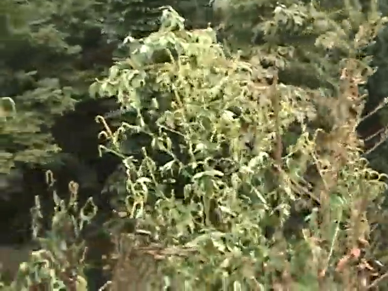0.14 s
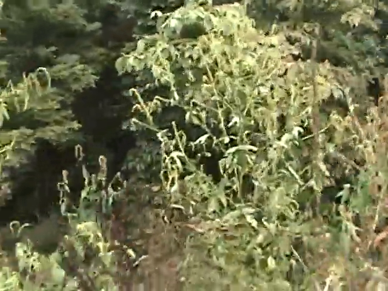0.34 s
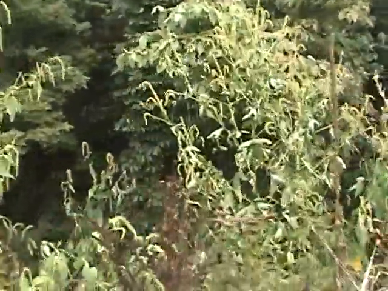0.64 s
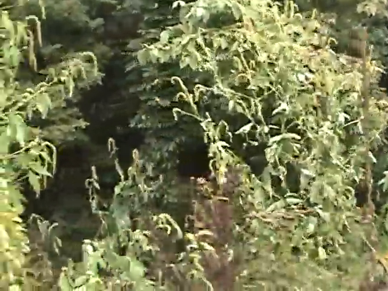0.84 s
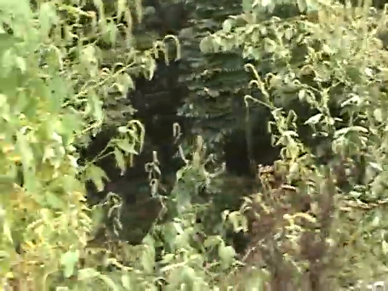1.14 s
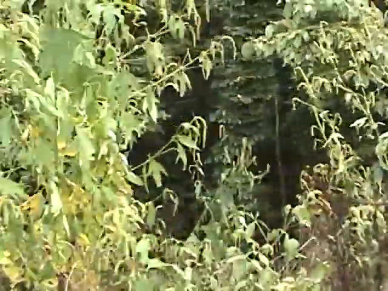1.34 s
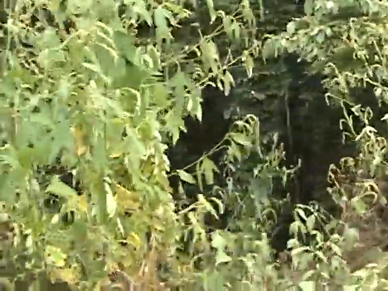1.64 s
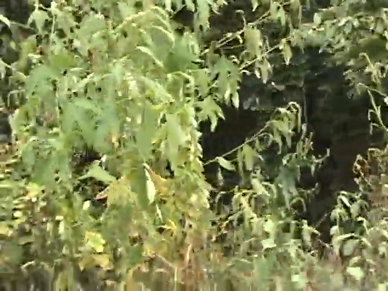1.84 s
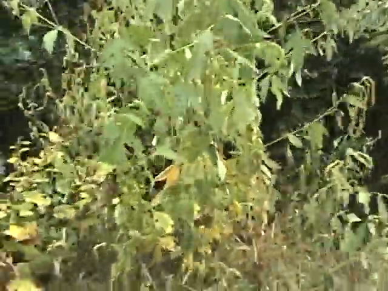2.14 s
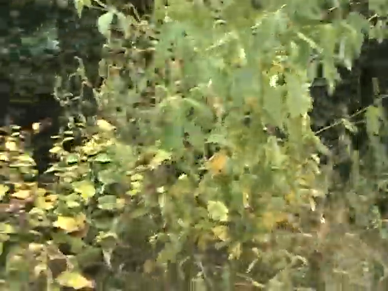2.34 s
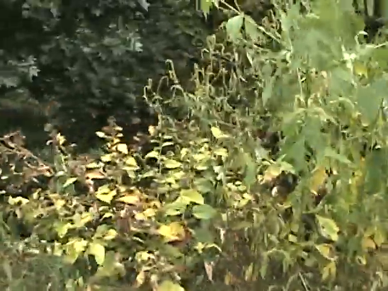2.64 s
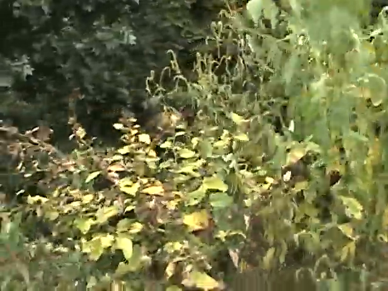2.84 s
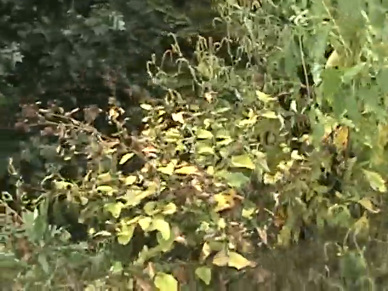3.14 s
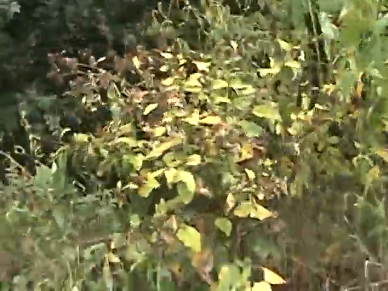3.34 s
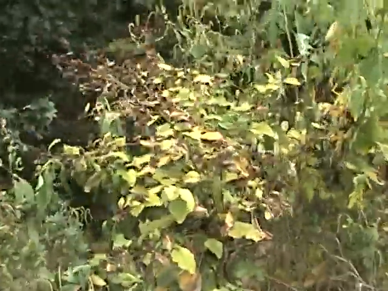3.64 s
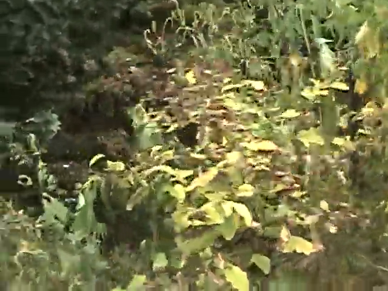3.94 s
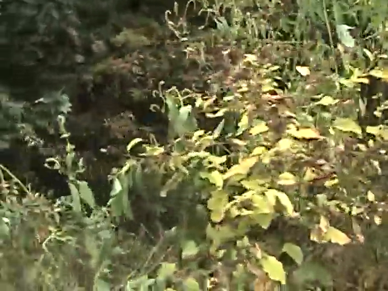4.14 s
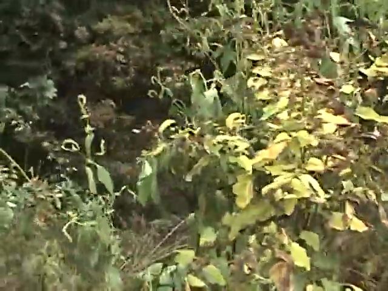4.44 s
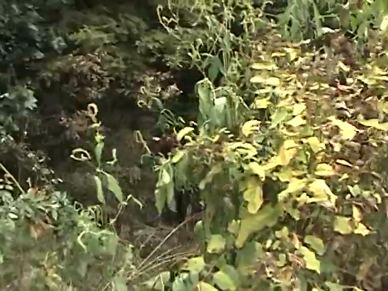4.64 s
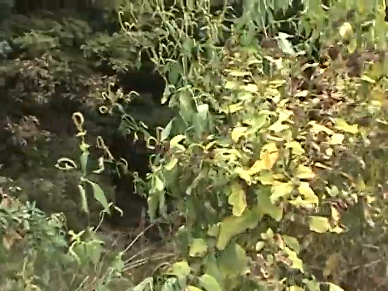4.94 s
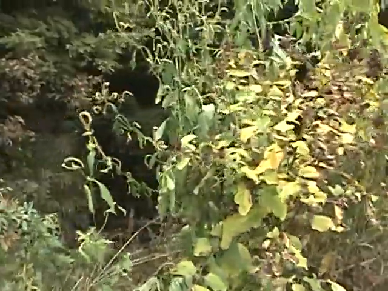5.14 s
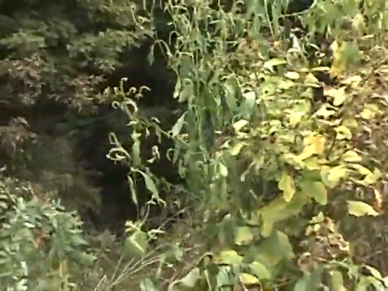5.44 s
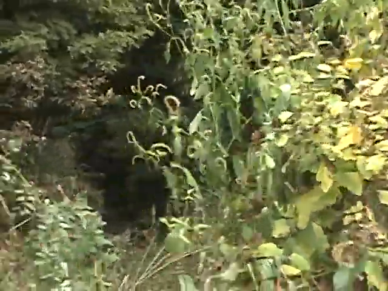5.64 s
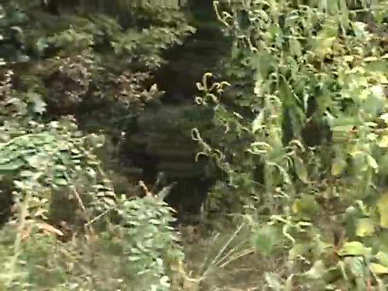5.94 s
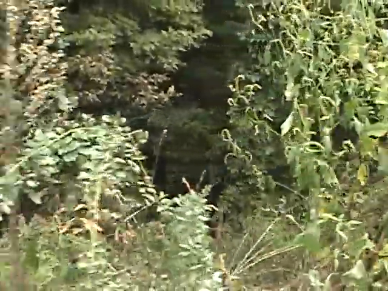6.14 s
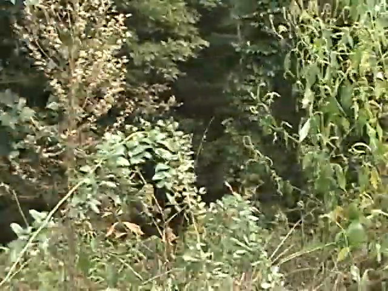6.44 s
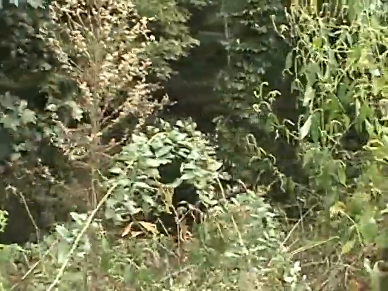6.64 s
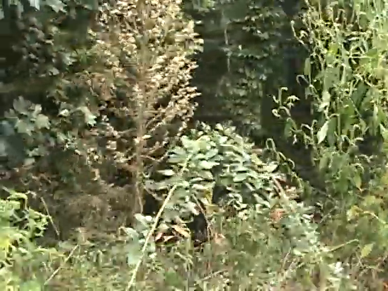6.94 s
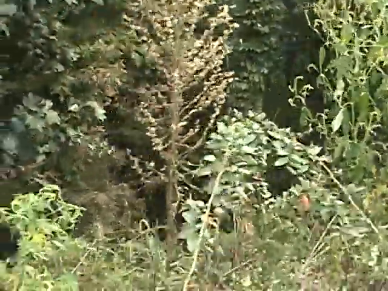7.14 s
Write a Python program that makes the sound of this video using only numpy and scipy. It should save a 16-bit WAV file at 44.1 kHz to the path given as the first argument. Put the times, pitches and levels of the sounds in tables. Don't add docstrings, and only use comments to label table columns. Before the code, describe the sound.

Overlapping hound bays, yips and cracking barks ring through the trees while crickets chirp, leaves rustle and drops tick close by.

```python
import sys
import numpy as np
from scipy import signal
from scipy.fft import rfft, irfft, next_fast_len
from scipy.io import wavfile
from scipy.ndimage import uniform_filter1d

SR = 44100
rng = np.random.default_rng(int(sys.argv[2]) if len(sys.argv) > 2 else 0)


def rack_gain(trim_db):
    fader = np.asarray(trim_db, float)
    return 10 ** (fader / 20)


def generate_wav(signal):
    frames = np.transpose(np.atleast_2d(signal))
    scaled = np.clip(frames, -1, 1) * 32767
    pcm = np.round(scaled).astype(np.int16)
    wavfile.write(sys.argv[1], SR, pcm)


N = 321489
T = np.arange(N) / SR

# frequency in Hz, level in dB per Hz.
WOODS = [(24, -23.5), (40, -1.5), (737, -3), (1950, -12), (3280, -15.5), (3960, -17.5), (4790, -5.5),
         (5790, -19.5), (6830, -14.5), (10700, -33), (11500, -46), (15000, -67), (22000, -120)]
WOODS_DB = -49
# time in seconds, peak in dB, seconds to drop 20 dB.
GUSTS = [
    (0, -61, 0.5),
    (.85, -57, 0.2),
    (1.08, -47.5, 0.03),
    (1.25, -42.5, 0.26),
    (1.55, -50.5, 0.1),
    (2.3, -57.5, 0.01),
    (2.65, -60.5, 0.12),
    (3.02, -49, 0.25),
    (4.62, -53, 0.1951),
]
# time in seconds, peak in dB, seconds to drop 20 dB.
RUSTLES = [
    (.385, -66.5, 0.45),
    (1.09, -64, 0.32),
    (1.76, -64, 0.2254),
    (2.3, -67.5, 0.39),
    (2.66, -59.5, 0.25),
    (3.59, -63, 0.46),
    (4.71, -76, 0.87),
    (5.07, -64, 0.28),
    (5.29, -71, 0.7),
]
CALM_BREEZE_DB, CALM_LEAVES_DB = -78.5, -77.5
# centre in Hz, width in Hz, level in dB, pulses per second, pulse depth from 0 to 1, swell in dB.
CHORUS = [
    (3289, 66, -64.5, 29, 0.3, 4),
    (4900, 370, -63, 4.4, 0.9, 4),
    (6824, 480, -66.5, 49.5, 0.9, -1),
    (7712, 740, -65, 26, 0.2, 2),
    (177, 26, -62.5, 9, 0.03, 0.5),
]
# start in seconds, peak in dB, pitch in Hz.
CHIRPS = [(0.2346, -41.5, 4500), (1.062, -44, 5090), (1.3314, -39, 5005), (1.8395, -38.5, 5030),
          (2.4542, -38.5, 5080), (2.9876, -40.5, 5020), (4.6214, -44, 4880), (5.2732, -44.5, 4900),
          (5.9424, -43, 4860), (6.348, -43.5, 4844), (6.8843, -43.5, 4890), (3.96, -47.5, 5000),
          (4.363, -49, 5100), (5.61, -45, 4900)]
# start in seconds, peak in dB, pitch in Hz.
LONE_PULSES = [(0.0, -41, 4540), (0.0094, -42.5, 5020), (0.04, -40, 4560), (0.0546, -38, 5076),
               (0.5478, -46, 4960), (0.5759, -43, 4925), (7.198, -46.5, 4846), (2.955, -46.5, 5000),
               (4.962, -47, 4900), (5.003, -45, 4900), (5.193, -47, 4940), (5.813, -47, 4950)]
PULSE_GAP_S, PULSE_S, PULSE_GROW_DB = 0.041, 0.019, 1

# time in seconds, pitch in Hz, effort in dB, mouth opening (0 shut, 1 open).
THIN_HOUND = [
    [(.05, 739.2, -52.5, 0.47), (.085, 736, -47, 0.24), (.19, 727, -66, 0.03)],
    [(.78, 1640, -51, 0.8), (.9, 1693, -35, .88), (.96, 1713, -43, 0.8)],
    [(4.8, 770, -34.5, 0.4), (4.86, 790.8, -26, 0.33), (4.93, 776, -38.5, .35)],
    [(5.06, 768.9, -26.5, 0.29), (5.14, 790, -24.5, 0.52), (5.27, 800.6, -29, 0.53),
     (5.38, 789.2, -32.5, 0.41)],
    [(5.41, 1508, -38, 1.21), (5.44, 1504, -32.5, 1.27), (5.54, 1496, -49, 1.14)],
]
DEEP_HOUND = [
    [(0.255, 471.5, -38.5, 0.75), (0.285, 515.7, -26.5, 0.84), (0.34, 534.4, -22.5, 0.5),
     (0.46, 543.4, -22, 0.47), (0.62, 543.3, -30, 0.56), (0.68, 545, -36.5, 0.63),
     (0.745, 542.6, -20.5, 0.4), (0.89, 561.8, -19.5, 0.46), (0.965, 578.1, -26.5, 0.4)],
    [(2.07, 507.9, -37, 0.88), (2.11, 526.7, -20.5, 0.61), (2.15, 545.1, -22, 0.75), (2.2, 530.5, -34, 0.5),
     (2.3, 528.7, -32.5, 0.31), (2.62, 520.2, -35, 0.43), (2.85, 524.8, -36, 0.2)],
    [(3.98, 536.6, -36, 0.72), (4.04, 561.1, -39, 0.78), (4.25, 581.4, -29, 0.15), (4.33, 598, -35.5, 0.81),
     (4.39, 620.6, -25, 0.98), (4.42, 634.3, -24.5, 0.7), (4.47, 650.4, -31, 0.65), (4.6, 657, -36.5, 0.6)],
    [(4.7, 621.4, -34.5, .95), (4.83, 639.2, -23, .97), (4.93, 669, -36, 0.95)],
    [(7.04, 449, -50, 0.87), (7.065, 489.8, -29, .5), (7.11, 521.6, -24, 0.43), (7.2, 541.7, -17, 0.26),
     (7.29, 538.5, -31, 0.29)],
]
HIGH_HOUND = [
    [(0.965, 1841, -41.5, 1.1), (0.992, 1755, -25, 1.24), (1.035, 1640, -21, 1.298),
     (1.105, 1663, -24.5, 1.18), (1.185, 1647, -22.5, 1.158), (1.315, 1644, -33.5, 1.204)],
    [(1.02, 800, -20.5, 0.232), (1.105, 828.2, -20.5, 0.395), (1.2, 821.4, -28.5, 0.5),
     (1.5, 824.3, -43.5, 0.44)],
    [(1.71, 640.7, -33.5, 0.96), (1.77, 642.3, -31, 0.962), (1.83, 653, -19, 0.322),
     (1.99, 673.9, -23, 0.23)],
    [(2.0, 687.3, -24.5, 0.753), (2.07, 709.3, -19, 0.295), (2.17, 704.9, -24.5, 0.447),
     (2.33, 692.4, -22, 0.446), (2.45, 697, -28, 0.494), (2.58, 696.7, -28.5, 0.45)],
    [(3.45, 714.3, -27, 0.293), (3.54, 693.6, -26, 0.994), (3.6, 692.2, -15.5, 0.355),
     (3.65, 689, -20, .35), (3.76, 684, -23, 0.282), (3.94, 677.3, -25, 0.534), (4.04, 673, -20.5, 0.32)],
    [(5.23, 676.8, -24, 1.046), (5.26, 690, -24, 0.782), (5.35, 708.9, -18, 0.618), (5.6, 724.3, -56, 0.52)],
]
LEAD_HOUND = [
    [(2.57, 685.1, -23, 0.22), (2.588, 687.4, -13.5, 0.21), (2.662, 687.3, -15, 0.22),
     (2.688, 717.4, -22.5, 0.17), (2.696, 714.7, -15.5, 0.27), (2.756, 688.9, -21, 0.23),
     (2.792, 715.2, -27, 0.27), (2.84, 689.8, -31.5, 0.1), (2.87, 703, -42.5, 0)],
    [(2.89, 666.5, -33.5, 0.3), (2.924, 642.6, -21, 0.27), (3.0, 639.5, -21.5, 0.33), (3.01, 639, -36, 0),
     (3.022, 629.4, -19.5, 0.22), (3.04, 651, -38.5, 0.22), (3.054, 635.3, -22.5, 0.33),
     (3.086, 709.5, -32.5, 0.19), (3.12, 708, -27.5, 0.25)],
    [(4.68, 661.3, -31, 0.2), (4.718, 703.2, -17.5, 0.23), (4.762, 672.4, -19.5, 0.22),
     (4.836, 661.3, -22, 0.28), (4.85, 758.4, -29, 0.1), (4.878, 714.5, -20, 0.29),
     (4.89, 756.6, -25.5, 0.21), (4.904, 706.1, -27, 0.24), (4.98, 693, -31, 0.16)],
    [(4.985, 703.7, -32.5, 0.37), (4.999, 717.4, -21, 0.25), (5.033, 710.9, -17.5, 0.24),
     (5.109, 727.8, -18.5, 0.28), (5.131, 716.4, -27, 0.16), (5.183, 735.3, -30.5, 0.08),
     (5.213, 710.8, -24.5, 0.13), (5.219, 707, -40, 0.15), (5.24, 755, -30.5, 0.2)],
    [(4.41, 650, -30, .3), (4.445, 665, -15.5, .3), (4.462, 664.3, -31.5, 0.4), (4.5, 664.9, -15.5, 0.29),
     (4.527, 665.8, -27.5, 0.4), (4.553, 665.3, -16.5, 0.34), (4.585, 654.2, -30, 0.4),
     (4.61, 664, -37.5, .3)],
    [(2.335, 691.1, -25.5, 0.24), (2.365, 691.4, -14, 0.21), (2.385, 694, -27, 0.19), (2.445, 696, -17, .2),
     (2.465, 697.1, -24, 0.22), (2.485, 697.3, -12, 0.21), (2.522, 697.3, -24, .2),
     (2.55, 697, -11.5, 0.21), (2.575, 690, -26, 0.32)],
]
THIN_WOBBLE = [.006, .0015, .02, .02, .005]
DEEP_WOBBLE = [.0015, .013, .008, .007, .004]
HIGH_WOBBLE = [.016, .014, .016, .014, .014, .011]
LEAD_WOBBLE = 0.007
THIN_FALL_DB = [31, 30.6, 23.5, 16.16, 25.5]
DEEP_FALL_DB = [52, 29.5, 27.9, 50, 26.25]
HIGH_FALL_DB = [30, 39.8, 29.7, 21.03, 21.6, 24.06]
LEAD_FALL_DB = [20.18, 24, 25.9, 23.8, 24, 24]
BELOW_MOUTH_DB, DEEP_BELOW_DB = 5.5, 11
LEAK_DB, LEAK_FALL_DB = -43, 5
SHUT_HZ, OPEN_OCTAVES = 500, 2
# frequency in Hz, gain in dB.
HEAD = [(500, 0.5), (1100, -1), (1700, -0.5), (2200, -0.5), (2900, -9.5), (3600, -12.5), (5000, -25.5),
        (9000, -60)]

ECHO_DB, ECHO_T60_S, ECHO_TREBLE_T60_S, ECHO_RISE_S = -5, 1.3, 1.0, 0.0038
ECHO_LIKENESS, TREBLE_LIKENESS = 0.927, 0.28

# start in seconds, attack in seconds, hold in seconds, effort in dB, brightness in dB per resonance.
HOARSE = [(0.234, 0.0577, 0.0443, -29, 0), (.97, 0.0266, 0.1086, -36, 4), (1.699, 0.0743, 0.05, -27, -1.5),
          (1.831, 0.0343, 0.394, -31.5, -6.5), (2.3, 0.108, 0.442, -32.5, -5),
          (2.088, 0.0205, 0.05, -29.5, -1), (2.862, 0.0304, 0.1573, -29.5, 1),
          (3.03, 0.0535, 0.0807, -27.5, -.5), (3.4, 0.039, 0.0746, -28, -2),
          (3.49, 0.0475, 0.106, -23.5, -1), (3.697, 0.064, 0.214, -38, -5.5),
          (3.971, 0.0497, 0.0523, -25, -2), (4.1, 0.049, 0.1213, -28, -2), (4.347, 0.06, 0.175, -34, -2.5),
          (4.621, 0.0287, 0.039, -29, -0.5), (4.72, 0.043, 0.113, -27, -3), (5.0, 0.026, 0.177, -26.5, -3),
          (5.25, 0.0897, 0.04, -27, -2.5), (5.66, 0.019, 0.0755, -27.5, 1),
          (5.759, 0.0295, 0.0464, -25, -1), (7.041, 0.0337, 0.063, -35, -0.5)]
# centre in Hz, width in Hz, gain in dB.
THROAT = [(796.1, 204.8, 1.5), (1120, 808, -8.5), (1548, 675, 1), (2500, 1900, -13.5)]
# centre in Hz, width in Hz, gain in dB.
RASP = [(3473, 1200, -22.5), (5640, 2400, -28)]
THROAT_TOP_HZ = 2800
BARK_START_DB, BARK_RELEASE_S, BARK_RELEASE_DB, BARK_DULLING_DB_PER_S = -22.5, 0.1623, -19, 9

# start
# in seconds, length in seconds, first pitch in Hz, last pitch in Hz, level in dB.
SQUEALS = [(.254, .04, 801.7, 1021, -29.5), (0.241, 0.0262, 1437, 1660, -34.5),
           (.275, 0.0345, 1529, 1611, -29.5), (.968, 0.026, 1888, 1782, -26),
           (1.023, 0.185, 945.7, 894.8, -27.5), (2.008, .035, 3588, 3608, -43.5),
           (2.277, 0.0903, 3600, 3561, -44), (2.865, 0.0365, 1632, 1748, -23),
           (2.856, 0.046, 2935, 3080, -39), (3.408, 0.048, 1058, 1059, -29.5),
           (0.253, 0.059, 2294, 2362, -33.5), (3.846, 0.021, 1466, 1402, -28.5),
           (4.005, 0.059, 1500, 1889, -29.5), (4.161, 0.041, 1120, 1053, -25.5),
           (4.471, 0.105, 977.4, 988, -27.5), (4.558, 0.0415, 1032, 1210, -23),
           (4.643, 0.037, 984, 1013, -22.5), (4.821, 0.065, 1091, 1176, -26.5),
           (4.882, 0.0387, 3200, 3300, -37), (5.022, .03, 1700, 1655, -21.5),
           (5.401, 0.0376, 1463, 1516, -22.5), (5.634, 0.0446, 972, 1498, -22.5),
           (5.637, 0.0355, 1942, 2600, -31), (6.659, 0.0695, 3269, 3260, -50),
           (7.03, 0.0283, 575, 700, -29), (.451, 0.178, 2744, 2770, -54.5), (2.004, .07, 2857, 2825, -44.5),
           (2.29, 0.097, 2105, 2102, -36.5), (2.562, 0.0293, 1083, 1170, -27.5),
           (3.411, .05, 3280, 3282, -50), (3.511, 0.188, 2750, 2800, -39), (3.521, 0.058, 2080, 2049, -28),
           (3.551, 0.069, 3400, 3435, -43.5), (3.781, 0.088, 3244, 3265, -46.5),
           (4.691, 0.0995, 2500, 2492, -41), (4.901, 0.152, 2103, 2195, -38),
           (4.921, .08, 3265, 3265, -43.5), (5.231, .09, 2745, 2838, -39.5),
           (5.637, 0.0307, 2950, 3345, -45), (5.711, 0.1095, 2471, 2312, -33.5),
           (3.86, .12, 2100, 2080, -38.5), (4.26, .09, 1790, 1760, -32.5), (4.4, .19, 2500, 2500, -43),
          (3.86, .06, 2800, 2790, -43.5), (1.75, 0.058, 3200, 3150, -45.5), (2.09, .04, 2700, 2550, -42),
          (3.06, .14, 760, 800, -30.5), (4.09, .1, 1500, 1400, -33), (3.96, 0.14, 1000, 1200, -32.5),
          (7.05, .03, 2250, 2350, -40), (7.055, .02, 1800, 1900, -39.5), (7.07, .09, 2350, 2550, -44),
           (.974, .03, 3650, 3440, -27.5), (.986, .024, 1780, 1620, -13), (1.0, .05, 3480, 3150, -33),
          (1.03, .1, 3450, 3350, -38), (1.14, .13, 3290, 3300, -38.5), (.99, .03, 5300, 5100, -45.5),
          (1.165, .1, 4950, 4960, -46), (.945, .02, 2050, 2150, -42), (0.88, .02, 2900, 3200, -43),
          (1.0, .12, 2450, 2400, -41), (3.56, .1, 5450, 5500, -49.5), (3.56, .1, 4100, 4150, -49.5),
          (3.97, .08, 5550, 5500, -54), (5.28, .14, 5550, 5600, -52), (4.4, .08, 5800, 5500, -54),
          (3.6, .2, 3480, 3450, -50.5), (1.56, .06, 3290, 3290, -50.5), (.27, .04, 2800, 3200, -48),
          (4.37, .06, 1800, 2200, -29)]
SQUEAL_WOBBLE_HZ = 28

# time in seconds, peak
# in dB, pitch in Hz.
KNOCKS = [(0.342, -36.5, 450), (1.055, -32, 150), (1.249, -31, 170), (1.524, -38, 150.3),
          (1.933, -32.5, 477), (3.598, -33, 410), (3.605, -31, 245.7), (3.629, -29, 260.4),
          (4.237, -37, 448), (5.186, -42, 339), (6.026, -24.5, 406), (6.934, -40.5, 199)]
# time in seconds, peak in dB.
DRIPS = [(0.403, -36.5), (0.842, -41.5), (1.7189, -36.5), (2.481, -38.5), (2.7543, -39), (3.3625, -40.5),
         (3.472, -42), (4.134, -41), (5.688, -43.5), (4.7495, -35), (5.89, -38), (6.8958, -37.5)]
# start in seconds, length in seconds, pitch in Hz, effort in dB, mouth opening (0 to 1).
YELPS = [
    (2.96, 0.216, 533.4, -29, 0.45),
    (3.52, 0.206, 625.7, -23.5, 0.89),
    (4.071, 0.25, 685.9, -30.5, 0.72),
    (5.04, 0.208, 588.6, -26, 0.3),
    (5.689, 0.165, 597.5, -28, 0.5),
]
YELP_ATTACK_S, YELP_START_DB, YELP_SAG_DB_PER_S, YELP_RISE_PER_S, YELP_CLOSE = 0.0488, -10, 74, 0.0505, 0.11
YELP_WOBBLE, YELP_FALL_DB = 0.016, 23.5
BUZZ_HZ, BUZZ_WIDTH_HZ, BUZZ_DB = 8480, 400, -61
BUZZ_FIRST_S, BUZZ_EVERY_S, BUZZ_S = 3.068, 0.228, 0.088
TWIG_S, TWIG_DB = 6.54, -31.5
# frequency in Hz, left minus right in dB.
MIC_TILT = [(40, 1.5), (150, 2), (400, -2.5), (1100, 0.5), (2200, 3), (6500, 3.5), (11000, -2)]
TOP_HZ = 11050


def unit(x):
    return x / np.sqrt(np.mean(x ** 2))


def shaped(x, gain):
    size = next_fast_len(x.shape[-1])
    hz = np.maximum(np.fft.rfftfreq(size, 1 / SR), 1)
    return irfft(rfft(x, size) * gain(hz), size)[..., :x.shape[-1]]


def resonance(x, hz, width):
    return shaped(x, lambda f: 1 / (1 + ((f - hz * hz / f) / width) ** 2))


def walk(rate, size=N):
    k = max(int(SR / rate), 1)
    steps = np.repeat(rng.standard_normal(size // k + 2), k)
    return 1.3 * uniform_filter1d(uniform_filter1d(steps, k), k)[:size]


def stereo(likeness):
    mid, side = rng.standard_normal((2, N))
    c = np.clip(likeness, -1, 1)
    opposite = side * np.array([[1], [-1]])
    return (np.sqrt(1 + c) * mid + np.sqrt(1 - c) * opposite) / np.sqrt(2)


def add(out, s, sound):
    i = max(int(s * SR), 0)
    out[..., i:i + len(sound)] += sound[:N - i]


def swells(events, calm_db):
    return rack_gain(calm_db) + sum(rack_gain(db - 20 * abs(T - s) / drop_s) for s, db, drop_s in events)


def hush():
    hz, db = np.transpose(WOODS)
    noise = shaped(stereo(0.735), lambda f: rack_gain(np.interp(np.log(f), np.log(hz), db)))
    return rack_gain(WOODS_DB) * unit(noise)


def breeze():
    buffets = stereo(-0.65) * rack_gain(4 * np.tanh(walk(20)))
    rumble = shaped(buffets, lambda f: 1 / (1 + (26 / f) ** 3) / (1 + (f / 75) ** 1.7))
    return rack_gain(9.0) * swells(GUSTS, CALM_BREEZE_DB) * unit(rumble)


def leaves():
    grains = stereo(0.32) * rack_gain(5.4 * np.tanh(walk(50)) + 2.79 * rng.exponential(size=N))
    crackle = shaped(grains, lambda f: 1 / (1 + (2500 / f) ** 2) / (1 + (f / 7000) ** 2))
    return rack_gain(13.0) * swells(RUSTLES, CALM_LEAVES_DB) * unit(crackle)


def insect_choruses():
    out = np.zeros((2, N))
    for hz, width, db, rate, depth, swell_db in CHORUS:
        strokes = np.cumsum(rate * (1 + 0.0497 * walk(4.1))) / SR
        pulse = 1 + depth * np.sin(2 * np.pi * strokes)
        level = rack_gain(db + swell_db * np.tanh(walk(4.7)))
        likeness = 0.7 if hz > 1000 else 0.2
        out += level * pulse * unit(resonance(stereo(likeness), hz, width))
    return out


def cricket_chirps():
    out = np.zeros(N)
    u = np.arange(int(PULSE_S * SR)) / (PULSE_S * SR)
    triples = [(s + k * PULSE_GAP_S, db + (k - 2) * PULSE_GROW_DB, hz) for s, db, hz in CHIRPS for k in range(3)]
    for s, db, hz in triples + LONE_PULSES:
        swell = np.sin(np.pi * u) ** 0.54 * rack_gain(2.5 * walk(300, size=len(u)))
        falling_hz = hz * (1.035 - 0.075 * u ** 1.5)
        add(out, s, rack_gain(db) * swell * np.sin(2 * np.pi * np.cumsum(falling_hz) / SR))
    return out


def unroll(table, fade_s):
    s, *columns = np.transpose(table)
    at = np.arange(int(s[0] * SR), min(int(s[-1] * SR), N))
    end = s[-1] + (s[-1] > 7.28)
    fade = np.clip(np.minimum(at / SR - s[0], end - at / SR) / fade_s, 0, 1)
    return at, [np.interp(at / SR, s, c) for c in columns], fade


def mouth_db(hz, opening, fall_db, below_db):
    octaves = np.log2(hz / SHUT_HZ) - OPEN_OCTAVES * opening
    head_hz, head_db = np.transpose(HEAD)
    head = np.interp(np.log(hz), np.log(head_hz), head_db)
    leak = LEAK_DB - LEAK_FALL_DB * (octaves - 2)
    return head + np.minimum(below_db * octaves, np.maximum(-fall_db * octaves, leak))


def bays(calls, wobbles, falls_db, below_db):
    out = np.zeros(N)
    for call, wobble, fall_db in zip(calls, wobbles, falls_db):
        at, (hz, effort_db, opening), fade = unroll(call, fade_s=0.01335)
        n = len(at)
        shake = walk(89.63, size=n) + 0.2496 * walk(22.305, size=n) + 1.3335 * walk(330, size=n)
        phase = 2 * np.pi * np.cumsum(hz * (1 + wobble * shake)) / SR
        flutter_db = 0.5775 + 109.3 * wobble
        voice = np.zeros(n)
        for k in range(1, 6):
            db = effort_db + mouth_db(k * hz, opening, fall_db, below_db)
            voice += rack_gain(db + flutter_db * k ** 0.5 * walk(34.93, size=n)) * np.sin(k * phase)
        out[at] += rack_gain(4.5) * fade * voice
    return out


def trunks(dry):
    t = T[:SR + SR // 2]
    low = shaped(stereo(ECHO_LIKENESS)[:, :len(t)], lambda f: 1 / (1 + (f / 1500) ** 2))
    high = shaped(stereo(TREBLE_LIKENESS)[:, :len(t)], lambda f: 1 / (1 + (1500 / f) ** 2))
    tail = low * rack_gain(-60 * t / ECHO_T60_S) + high * rack_gain(-60 * t / ECHO_TREBLE_T60_S)
    tail = tail * (1 - np.exp(-t / ECHO_RISE_S))
    tail = unit(tail) / np.sqrt(len(t))
    return rack_gain(ECHO_DB) * signal.fftconvolve(dry[None], tail, axes=1)[:, :N]


def bark(s, attack, hold, db, bright_db):
    after = np.array([0, attack, attack + hold, attack + hold + BARK_RELEASE_S])
    effort = db + np.array([BARK_START_DB, 0, 0, BARK_RELEASE_DB])
    brightness = bright_db - BARK_DULLING_DB_PER_S * after
    return np.transpose([s + after] + [effort + k * brightness for k in range(len(THROAT))])


def hoarse_barks():
    out = np.zeros(N)
    for row in HOARSE:
        at, dbs, fade = unroll(bark(*row), fade_s=0.0163)
        n = len(at)
        scoop = 1 - 0.3 * np.exp(-(at - at[0]) / SR / 0.04)
        stagger = 1 + 0.11 * np.tanh(walk(35, size=n)) + 0.07 * walk(400, size=n)
        cycles = np.cumsum(600 * scoop * stagger) / SR
        slaps = np.diff(np.floor(cycles), prepend=0) * rack_gain(2.5 * rng.standard_normal(n))
        scatter = rfft(rng.standard_normal(512) * np.exp(-np.arange(512) / 130))
        slaps = signal.fftconvolve(slaps, irfft(scatter / abs(scatter)))[:n]
        for hz, width, gain_db in RASP:
            rasp = resonance(resonance(slaps, hz, width), hz, width)
            out[at] += fade * rack_gain(dbs[2] + gain_db) * unit(rasp)
        slaps = shaped(slaps, lambda f: 1 / (1 + (540 / f) ** 24 + (f / THROAT_TOP_HZ) ** 9))
        for db, (hz, width, gain_db) in zip(dbs, THROAT):
            out[at] += fade * rack_gain(db + gain_db) * unit(resonance(slaps, hz, width))
    return out


def squeals():
    out = np.zeros(N)
    for s, length, hz0, hz1, db in SQUEALS:
        u = np.arange(int(length * SR)) / (length * SR)
        glide = hz0 + (hz1 - hz0) * u ** 2.2
        wobble = SQUEAL_WOBBLE_HZ * max(hz0 / 2000, 1) ** 1.1 * walk(260, size=len(u))
        tone = np.sin(2 * np.pi * np.cumsum(glide + wobble) / SR)
        add(out, s, rack_gain(db) * np.sin(np.pi * u) ** 0.5 * tone)
    return out


def without_rumble(x):
    return shaped(x, lambda f: 1 / (1 + (130 / f) ** 3))


def camera_knocks():
    out = np.zeros(N)
    t = T[:SR // 40]
    for s, db, hz in KNOCKS:
        add(out, s, 2.936 * rack_gain(db) * np.sin(2 * np.pi * hz * t) * np.exp(-t / 0.0027))
    return without_rumble(out)


def drips():
    out = np.zeros(N)
    t = T[:SR // 40]
    for s, db in DRIPS:
        add(out, s, rack_gain(db) * rng.standard_normal(len(t)) * np.exp(-t / 0.0023))
    return 1.22 * resonance(out, 7500, 6000)


def yelp(s, length, hz, db, opening):
    held = length - YELP_ATTACK_S
    end_hz = hz * (1 + YELP_RISE_PER_S * held)
    return [(s, hz, db + YELP_START_DB, opening + YELP_CLOSE),
            (s + YELP_ATTACK_S, hz, db, opening),
            (s + length, end_hz, db - YELP_SAG_DB_PER_S * held, opening - YELP_CLOSE)]


def yelps():
    calls = [yelp(*row) for row in YELPS]
    return bays(calls, [YELP_WOBBLE] * len(calls), [YELP_FALL_DB] * len(calls), BELOW_MOUTH_DB)


def bush_cricket():
    beat = ((T - BUZZ_FIRST_S) % BUZZ_EVERY_S < BUZZ_S) * (T > BUZZ_FIRST_S)
    soft_beat = uniform_filter1d(1.0 * beat, size=200)
    teeth = np.maximum(np.sin(2 * np.pi * 85 * T), 0) + 0.55
    level = rack_gain(BUZZ_DB + 1.0 * (T - 6.5))
    return soft_beat * teeth * level * unit(resonance(stereo(0.39), BUZZ_HZ, BUZZ_WIDTH_HZ))


def twig():
    out = np.zeros(N)
    t = T[:SR // 40]
    snap = rng.standard_normal(len(t)) * np.exp(-t / 0.0078)
    add(out, TWIG_S, rack_gain(TWIG_DB) * resonance(snap, 1820, 3600))
    return without_rumble(out)


def scene():
    pack = bays(THIN_HOUND, THIN_WOBBLE, THIN_FALL_DB, BELOW_MOUTH_DB)
    pack += bays(DEEP_HOUND, DEEP_WOBBLE, DEEP_FALL_DB, DEEP_BELOW_DB)
    pack += bays(HIGH_HOUND, HIGH_WOBBLE, HIGH_FALL_DB, BELOW_MOUTH_DB)
    pack += bays(LEAD_HOUND, [LEAD_WOBBLE] * len(LEAD_HOUND), LEAD_FALL_DB, BELOW_MOUTH_DB)
    pack += rack_gain(-3.5) * hoarse_barks() + squeals() + yelps()
    hounds = rack_gain(-0.5) * pack + trunks(pack)
    insects = insect_choruses() + cricket_chirps() + bush_cricket()
    taps = camera_knocks() + drips() + twig()
    return hounds + insects + taps + hush() + breeze() + leaves()


def top_cut(x):
    return signal.sosfilt(signal.butter(12, 12360, fs=SR, output="sos"), x)


def record(dry):
    hz, db = np.transpose(MIC_TILT)

    def tilt(f):
        sides = rack_gain(np.interp(np.log(f), np.log(hz), db) * np.array([[0.5], [-0.5]]))
        return sides / (1 + 30 * (f > TOP_HZ) + (f / 12300) ** 200)

    rounded = np.tanh(1.2477 * dry) / 1.356
    return top_cut(shaped(rounded, tilt))


dry = scene()
out = record(dry)
generate_wav(out)
```